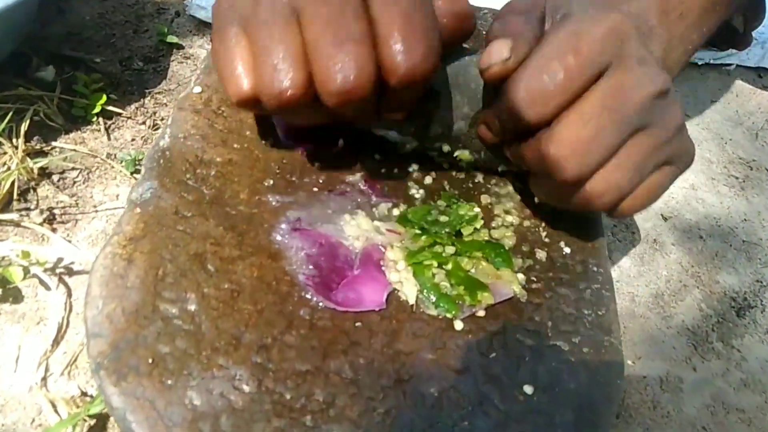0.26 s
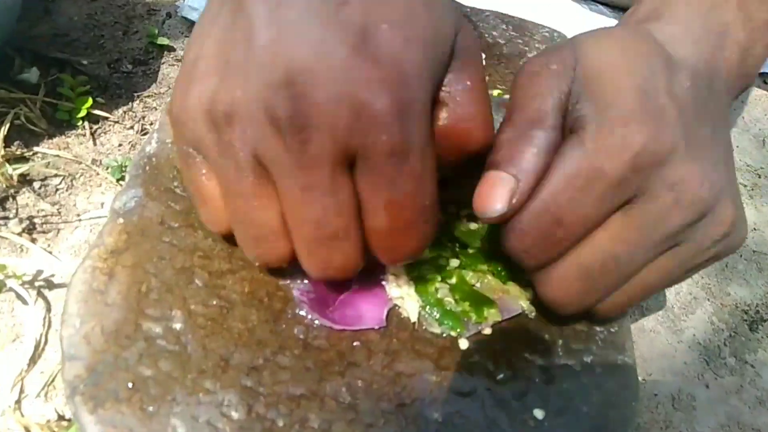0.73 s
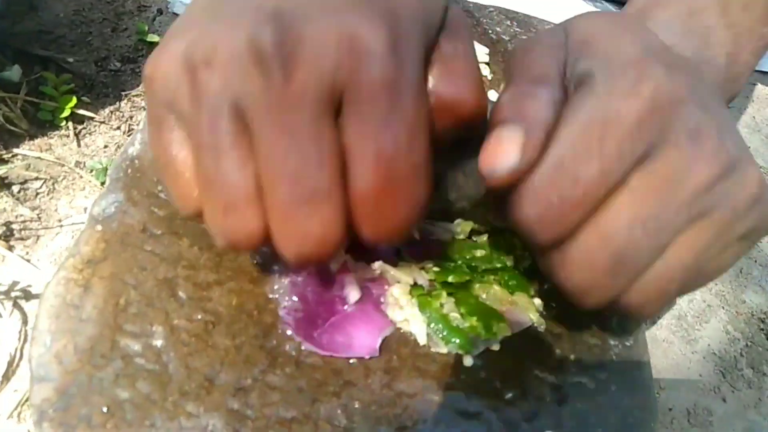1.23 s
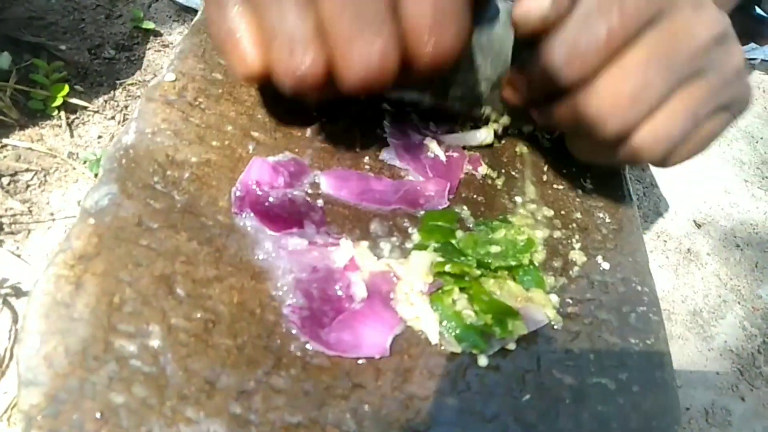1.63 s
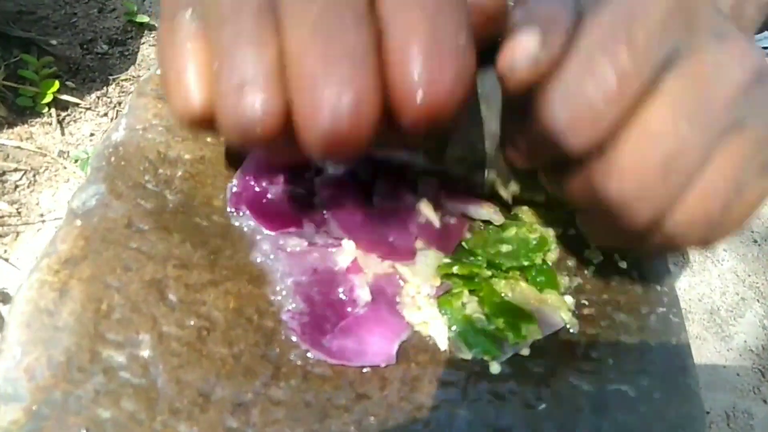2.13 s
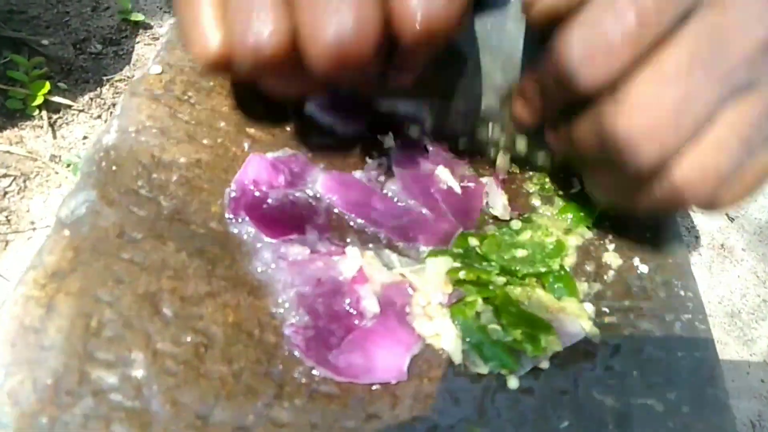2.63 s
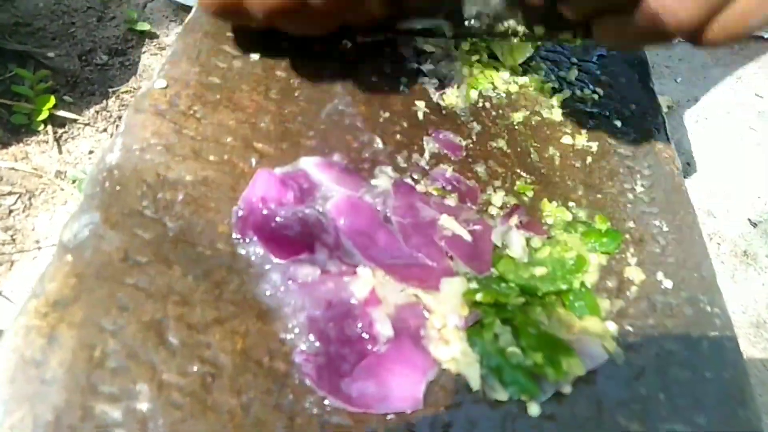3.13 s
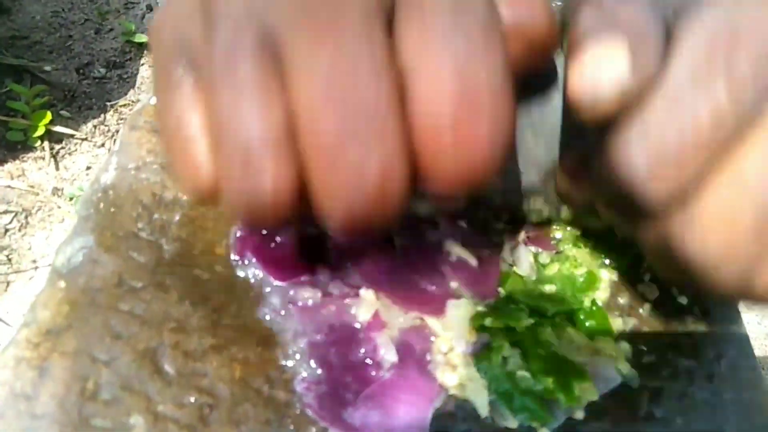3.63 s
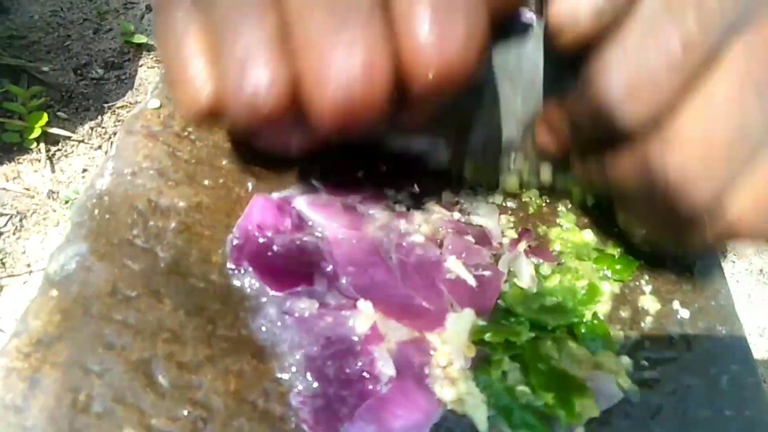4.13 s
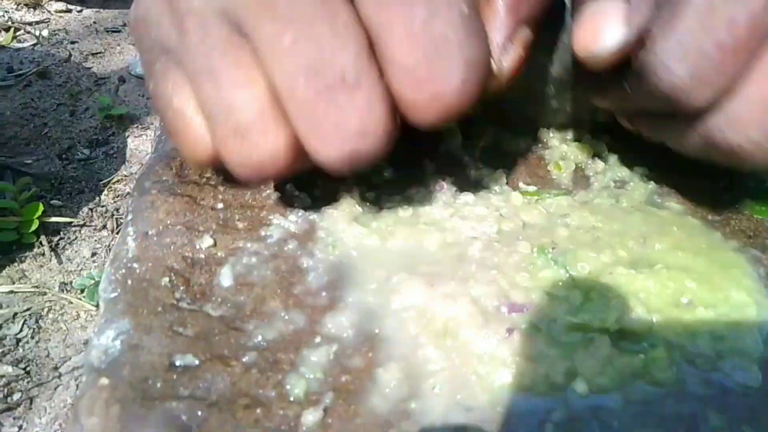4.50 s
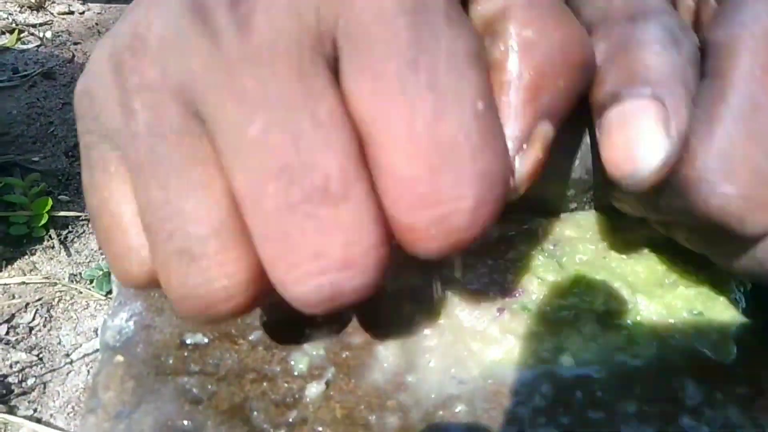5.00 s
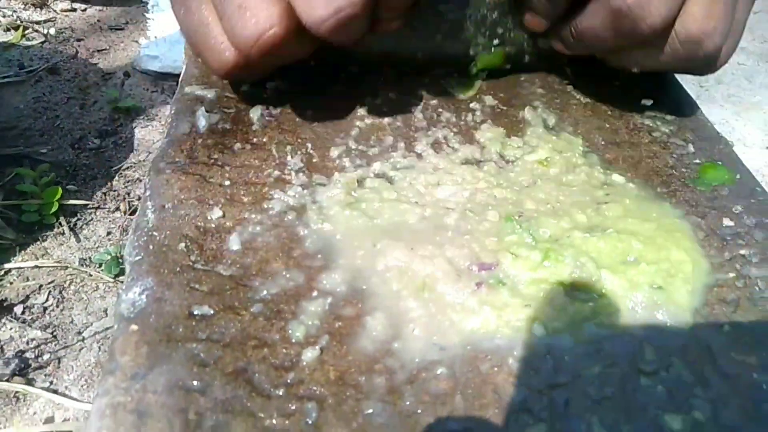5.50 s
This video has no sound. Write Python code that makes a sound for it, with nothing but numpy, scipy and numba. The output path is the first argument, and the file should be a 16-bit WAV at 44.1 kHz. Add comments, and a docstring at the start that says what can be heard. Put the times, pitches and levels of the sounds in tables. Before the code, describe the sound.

Close outdoor sound of a hand stone rubbed back and forth on a stone slab, roughly seven short strokes a second, over very faint air rumble and hiss. From 0 to 1.1 s the rubs are light, gritty and wet. Around 1.2 to 2.1 s the pushes grow firm, with a hollow mid-pitched scraping tone and loud stone clacks near 1.3, 1.85 and 2 s. A softer, squishier stroke follows at 2.25 s, then firm rubs and a tight rattle of knocks near 3.15 s. From 3.3 to 4.1 s it is lighter and juicier, with bubbly crackle, small snaps and dull low bumps; a firm push comes at 4.28 s. Near-silence lasts from about 4.39 to 4.45 s. Then longer, even, duller strokes grind smooth paste, alternating stronger pushes and weaker pulls, with a fine bright wet fizz and a few muted knocks until about 5.7 s. Echoes are barely noticeable.

```python
"""A hand stone rubs back and forth on a stone slab outdoors, about seven strokes a second: random grit impacts
drive broad stone colours and a gliding contact tone.
Knocks excite short slab modes; onion, garlic and leaves squish as shaped impact noise and bubble pings, and snap.
After a brief near-silence the spices are a smooth paste and the strokes are longer, duller and more even.
Faint outdoor rumble and hiss are shaped noise; weak echoes come from a short noise tail."""
import sys
import numpy as np
from scipy import signal
from scipy.fft import rfft, irfft, next_fast_len
from scipy.io import wavfile
from scipy.ndimage import uniform_filter1d, map_coordinates
from numba import njit

SR = 44100
rng = np.random.default_rng(int(sys.argv[2]) if len(sys.argv) > 2 else 0)


def bounce(signal):
    """Save signal as a 16-bit WAV file at the path given by the first command-line argument."""
    frames = np.transpose(np.atleast_2d(signal))
    limited = np.clip(frames, -1, 1)
    pcm = np.round(limited * 32767).astype(np.int16)
    wavfile.write(sys.argv[1], SR, pcm)


N = 253575

# Levels in the tables are relative within each layer.
# stone drops on the slab at a turn or jumps a hard grain: t/s, level/dB, contact tone f/Hz
KNOCKS = [(0.045, -15.5, 1440), (0.317, -26, 1050), (0.804, -26, 1670), (0.831, -24, 1020),
          (0.914, -21, 1100), (1.19, -13.5, 1490), (1.276, -6.5, 1610), (1.543, -18.5, 1580),
          (1.839, -6, 1800), (1.876, -14.5, 1640), (1.973, -8.5, 1510), (2.055, -16.5, 1430),
          (2.459, -24, 1790), (2.62, -26.5, 684), (2.65, -24, 1320), (2.733, -21, 1550), (2.794, -16, 1630),
          (2.876, -11.5, 1440), (3.079, -13.5, 1720), (3.151, -14, 1550), (3.165, -13.5, 1660),
          (3.176, -10.5, 1580), (3.181, -7.5, 1570), (3.445, -27.5, 2040), (3.843, -27, 900),
          (4.102, -20, 1410), (4.212, -22.5, 1710), (4.25, -17, 1680), (4.589, -14, 1610),
          (4.812, -18, 760), (4.91, -17.5, 1910), (4.945, -14.5, 1790), (5.105, -16.5, 1010),
          (5.131, -18.5, 630)]
# crisp pieces and bubbles burst: t/s, level/dB, f/Hz
SNAPS = [(0.1155, -25, 6400), (0.387, -25, 3370), (0.4317, -24.5, 6850), (0.7187, -23.5, 6100),
         (1.0038, -30, 6200), (1.2804, -17.5, 6600), (1.5244, -24.5, 7550), (1.8238, -20, 6100),
         (2.1773, -26, 7000), (2.194, -25, 6660), (2.2612, -23.5, 6950), (3.015, -24, 6570),
         (3.3623, -20.5, 3440), (3.68, -30, 7560), (4.7576, -31, 13600), (5.0432, -24.5, 8500),
         (5.1114, -17.5, 8600), (5.4193, -28, 14200)]
# soft low bumps of the slab on the ground: t/s, level/dB
BUMPS = [(0.471, -48), (0.73, -52), (3.348, -51), (3.495, -41), (3.544, -46.5), (3.645, -51), (4.66, -45),
         (4.945, -45)]
# slab modes: f/Hz, level/dB, t60/s
SLAB_MODES = [(725, -11, 0.054), (840, -23, 0.11), (1150, -3, 0.031), (1410, -36, .04), (1613, -6.5, 0.03),
              (1780, -15, 0.038), (1990, -9, 0.039), (2357, 3, 0.052)]
# spectral colour of bare stone: f/Hz, level/dB
BARE_STONE = [(150, -25.5), (260, -26), (400, -15.5), (650, -4.5), (920, -5), (1250, -0.5), (1600, -0.5),
              (1900, -7.5), (2120, -23.5), (2330, -4.5), (2750, -31.5), (3700, -36.5), (4700, -37),
              (16000, -38)]
# stone coated with paste: f/Hz, level/dB
COATED_STONE = [(150, -23.5), (330, -16.5), (480, -9.5), (650, 3), (1080, -3), (1500, 3), (1880, 2),
                (2100, -10), (2350, -8), (2650, -23), (3500, -33), (4500, -63), (16000, -59)]
# loose juice: f/Hz, level/dB
JUICE = [(2350, -23), (4000, -11.5), (4820, -25), (6470, -3), (6860, 1), (7700, -3.5), (8450, -10.5),
         (10500, -13.5), (12300, -11.5), (14800, -9), (16000, -6.5)]
# tearing fibres: f/Hz, level/dB
FIBRES = [(150, 6), (330, -6), (650, 3), (900, -1), (1450, 8), (2000, 7.5), (2650, -1), (3800, -4),
          (5000, -30), (8000, -25)]
# smooth paste: f/Hz, level/dB
PASTE = [(3000, -19.5), (4500, -15), (5500, -1), (6500, -15), (7500, -2.5), (8500, 0.5), (9900, -21),
         (11000, -2.5), (12000, -8), (14200, -3), (15600, -3)]
# soil under the slab: f/Hz, level/dB
GROUND = [(50, -23), (170, 10.5), (330, -0.5), (800, 0.5), (1500, -22), (4000, -60)]
# outdoor air: f/Hz, level/dB
AIR = [(20, 26.5), (45, 13.5), (110, 8.5), (260, 6), (900, -1), (1800, 1.5), (2600, -4.5), (4700, -14.5),
       (6800, -6), (9000, -10), (15500, -9)]
# thin overtones of the hand stone: f/Hz, half bandwidth of each of two passes/Hz, level/dB
STONE_MODES = [(5160, 510, -11.5), (8360, 430, 2.5), (10640, 360, -5)]
# near-silence: start t/s, end t/s
PAUSE_S = (4.386, 4.452)
# top treble of the wet sounds, rising as the microphone comes nearer: t/s, level/dB; bubble pitch rises with it
TOP_TREBLE = [(0, -11), (2.2, -10), (3.2, -1.5), (4.2, 2.5), (5.7, 4.5)]
# stone pushed into the spices: crest t/s, length/s, stone level/dB, juice level/dB
PUSHES = [(0.17, 0.097, -35.5, -50), (0.448, 0.11, -38, -53.5), (0.822, 0.068, -38, -46.5),
          (1.081, 0.079, -41, -48), (1.337, .09, -25.5, -47), (1.599, 0.12, -26, -48.5),
          (1.868, 0.093, -23.5, -48), (2.255, 0.17, -56.5, -40.5), (2.525, .10, -31, -45.5),
          (2.788, 0.11, -27, -48), (3.06, .11, -26, -46), (3.445, .06, -40, -43), (3.759, .11, -46, -44),
          (4.013, 0.096, -43.5, -43), (4.278, 0.091, -23, -43.5)]
# stone pulled back over nearly bare slab: crest t/s, length/s, stone level/dB, juice level/dB, contact tone f/Hz
PULLS = [(0.052, .022, -37.5, -53.5, 2230), (0.314, 0.037, -39.5, -54, 1600),
         (0.921, 0.019, -44, -56, 2180), (1.201, .034, -35.5, -56.5, 2140), (1.465, .035, -39, -53.5, 1300),
         (1.714, 0.029, -45.5, -55.5, 1090), (1.985, 0.2, -32.5, -58.5, 1440),
         (2.361, .12, -58, -53.5, 1390), (2.645, 0.067, -37.5, -52, 1290), (2.908, 0.074, -37, -57.5, 1440),
         (3.18, .175, -31.5, -63, 1514), (3.554, .1, -53.5, -52.5, 527), (3.846, 0.038, -41.5, -54.5, 776),
         (4.122, .10, -31.5, -50, 1330), (4.361, 0.042, -40, -71, 1610)]
# strokes through paste, pull and push in turn: crest t/s, length/s, stone level/dB
PASTE_STROKES = [(4.495, 0.092, -52.5), (4.646, .115, -29), (4.795, 0.12, -35.5), (4.935, 0.13, -28),
                 (5.087, 0.14, -32.5), (5.243, 0.15, -28), (5.399, .145, -33), (5.55, 0.14, -28),
                 (5.695, 0.14, -32)]
# in paste, a pull and a push: contact tone f/Hz, glide as share of pitch, tone share 0-1,
# juice re stone level/dB, tearing re juice level/dB before TEAR_TRIM_DB
PASTE_WAYS = [(880, -.5, .36, -17.5, 3), (1102, 0.32, 0.19, -26, -4)]
# a larger wet piece gives way between strokes: crest t/s, rise/s, fall/s, level/dB
SQUELCHES = [(1.775, 0.077, 0.045, -53), (2.99, 0.065, .022, -50.5), (3.319, 0.025, 0.017, -44.5),
             (3.5, .05, 0.054, -46.5), (3.897, 0.051, 0.057, -48)]
# bare stones ring on as they bounce apart: f/Hz, level re KNOCKS/dB, t60/s
FREE_RING = (2335, -28, .13)
# juice round a stroke: delay after stone crest/s, rise/s, fall/s, tearing level/dB before TEAR_TRIM_DB
PUSH_JUICE, PULL_JUICE = (-.009, 0.0982, 0.0686, -53), (.014, .075, .11, -61.5)

TOP_HZ = 15650  # band limit
PUSH_RISE, PULL_RISE, PASTE_RISE = .47, .3, .5  # share of a stroke before its crest
PUSH_SWELL, PULL_SWELL, PASTE_SWELL = 1.67, 1.36, 1.33  # pointedness: 1 = a plain arch
FIRM_DB, FIRM_HZ, FIRM_SHARE = -26, 1640, 0.92  # firm push: level, contact tone, share of that tone
LIGHT_HZ_PER_DB, LIGHT_SHARE_PER_DB = 10, .012  # a lighter push sings higher and less clearly
SING_DB = -41.5  # below about this level a push slides on the juice and hardly sings
PUSH_GLIDE, PULL_GLIDE = -0.12, 0.088  # tone change through a stroke, share of its pitch
PULL_SHARE = .27  # share of the contact tone in a pull
SQUELCH_TEAR_DB = -13.5  # tearing re juice, before TEAR_TRIM_DB
TEAR_TRIM_DB = 4.0  # added to every tearing level
PAUSE_DB = -28  # gain during the pause


def amp(db):
    """Decibels to gain."""
    return 10 ** (np.asarray(db) / 20)


def unit(x):
    """Scale to rms 1."""
    return x / np.sqrt(np.mean(x ** 2) + 1e-20)


def add(track, t_s, sound):
    """Mix a sound into a track from t_s on."""
    i = round(t_s * SR)
    start = max(i, 0)
    part = sound[max(-i, 0):max(N - i, 0)]
    track[start:start + len(part)] += part


def along(points, hz):
    """Gain of (Hz, dB) points on a log frequency axis."""
    f_hz, db = np.transpose(points)
    return amp(np.interp(np.log(hz + 1), np.log(f_hz), db))


def response(points, size=2048):
    """Causal (minimum-phase) impulse response of energy 1 with the given colour."""
    cepstrum = irfft(np.log(along(points, np.fft.rfftfreq(size, 1 / SR))))
    cepstrum[1:size // 2] *= 2
    cepstrum[size // 2 + 1:] = 0
    h = irfft(np.exp(rfft(cepstrum)))
    return h / np.linalg.norm(h)


def through(x, h):
    """x played through an impulse response."""
    return signal.fftconvolve(x, h)[:len(x)]


@njit
def resonate(x, hz, q):
    """Band-pass resonance with a moving centre and gain q there."""
    y, low, band = np.zeros(len(x)), 0., 0.
    for i in range(len(x)):
        g = np.tan(np.pi * hz[i] / SR)
        y[i] = (band + g * (x[i] - low)) / (1 + g * (g + 1 / q))
        band = 2 * y[i] - band
        low += 2 * g * y[i]
    return y


def ring(x, hz, q):
    """Fixed resonance with gain 1 at its centre."""
    return resonate(x, np.full(len(x), float(hz)), float(q)) / q


def swing(rise_s, fall_s, power):
    """Level through one stroke: the hand speeds up and slows to the turn."""
    t = np.arange(round((rise_s + fall_s + .02) * SR)) / SR
    progress = np.interp(t, [0, rise_s, rise_s + fall_s], [0, .5, 1])
    return np.abs(np.sin(np.pi * progress)) ** power


def grains(n, rate_hz, spread_db):
    """Random tiny impacts of widely different sizes and either sign."""
    sizes = amp(spread_db * np.clip(rng.standard_normal(n), -2, 2))
    return (rng.random(n) < rate_hz / SR) * sizes * rng.choice([-1, 1], n)


def judder(n, rate_hz, depth_db):
    """Uneven pressure as the stone catches and slips: smooth random gain within +-depth_db."""
    knots = rng.standard_normal(int(n * rate_hz / SR) + 4)
    wander = map_coordinates(knots, [np.arange(n) * rate_hz / SR])
    return amp(depth_db * np.tanh(wander))


def played(x, level):
    """Lay x under a level curve, keeping the energy of that curve."""
    return unit(x * level) * np.sqrt(np.mean(level ** 2))


def open_air():
    """Faint steady outdoor rumble and hiss: noise in the colour of the air."""
    spectrum = rfft(rng.standard_normal(N)) * along(AIR, np.fft.rfftfreq(N, 1 / SR))
    return amp(-58) * unit(irfft(spectrum, N))


def squeezes():
    """Every stroke presses out juice: crest t/s, rise/s, fall/s, level/dB, tearing re juice/dB."""
    for table, (delay_s, rise_s, fall_s, tear_db) in ((PUSHES, PUSH_JUICE), (PULLS, PULL_JUICE)):
        for crest_s, _, _, juice_db, *_ in table:
            yield crest_s + delay_s, rise_s, fall_s, juice_db, tear_db - juice_db
    for k, (crest_s, length_s, stone_db) in enumerate(PASTE_STROKES):
        *_, juice_db, tear_db = PASTE_WAYS[k % 2]
        yield crest_s, length_s / 2, length_s / 2, stone_db + juice_db, tear_db
    for row in SQUELCHES:
        yield *row, SQUELCH_TEAR_DB


def bubbles(n, rate_hz, centre_hz, cycles):
    """Tiny bubbles, each ringing at its own pitch and losing 60 dB in the given cycles."""
    count = max(int(rate_hz * n / SR), 1)
    pitch, size = rng.standard_normal((count, 2)).T[:, :, None]
    age = np.arange(SR // 150)  # samples
    phase = np.minimum(centre_hz * np.exp(.22 * pitch), TOP_HZ) * age / SR
    strength = amp(4.5 * np.clip(size, -2, 2))
    pings = strength * np.sin(2 * np.pi * phase) * amp(-60 * phase / cycles)
    at = rng.integers(0, n, (count, 1)) + age
    return np.bincount(at.ravel(), pings.ravel(), n)[:n]


def squishing():
    """Countless cells and bubbles burst under each stroke while fibres tear lower down."""
    out = np.zeros(N)
    juice, paste, fibres = response(JUICE), response(PASTE), response(FIBRES)
    for crest_s, rise_s, fall_s, db, tear_db in squeezes():
        level = swing(rise_s, fall_s, power=1.27)
        n = len(level)
        pressure = judder(n, rate_hz=71.0, depth_db=6.0)
        fizz = grains(n, rate_hz=9000, spread_db=8.0) * pressure
        if crest_s < PAUSE_S[0]:  # loose juice holds bubbles; their pitch rises with the top treble
            bubble_hz = 7500 + 110 * np.interp(crest_s, *np.transpose(TOP_TREBLE))
            pings = bubbles(n, rate_hz=1100, centre_hz=bubble_hz, cycles=32)
            fizz = unit(through(fizz, juice)) + amp(-9.5) * unit(pings * pressure)
        else:
            fizz = through(fizz, paste)
        tear_grit = grains(n, rate_hz=4500, spread_db=4.5) * pressure
        tear = through(tear_grit * judder(n, rate_hz=151.4, depth_db=5.5), fibres)
        wet = played(fizz, level) + amp(tear_db + TEAR_TRIM_DB) * played(tear, level)
        add(out, crest_s - rise_s, amp(db) * wet)
    return out


def yard(x):
    """Weak scattered echoes from the ground and nearby things: a decaying noise tail."""
    t = np.arange(SR // 3) / SR
    tail = rng.standard_normal(len(t)) * amp(-60 * t / 0.12) * (1 - np.exp(-t / 0.0014))
    return through(x, tail / np.linalg.norm(tail))


def stroke(crest_s, length_s, rise_share, db, hz, glide, share, swell):
    """One stroke whose contact tone glides through hz."""
    rise_s = length_s * rise_share
    from_hz, to_hz = hz * (1 - glide / 2), hz * (1 + glide / 2)
    return crest_s, rise_s, length_s - rise_s, db, from_hz, to_hz, share, swell


def strokes():
    """Firmer pushes sing more; pulls rasp; in paste the tone falls on a pull and climbs on a push."""
    for crest_s, length_s, db, _ in PUSHES:
        lighter_db = FIRM_DB - db
        hz = FIRM_HZ + LIGHT_HZ_PER_DB * lighter_db
        share = (FIRM_SHARE - LIGHT_SHARE_PER_DB * lighter_db) / (1 + np.exp(SING_DB - db))
        yield stroke(crest_s, length_s, PUSH_RISE, db, hz, PUSH_GLIDE, share, PUSH_SWELL)
    for crest_s, length_s, db, _, hz in PULLS:
        yield stroke(crest_s, length_s, PULL_RISE, db, hz, PULL_GLIDE, PULL_SHARE, PULL_SWELL)
    for k, (crest_s, length_s, db) in enumerate(PASTE_STROKES):
        hz, glide, share, _, _ = PASTE_WAYS[k % 2]
        yield stroke(crest_s, length_s, PASTE_RISE, db, hz, glide, share, PASTE_SWELL)


def stone_overtones(grit):
    """Thin high modes of the hand stone, each a doubled resonance."""
    out = np.zeros(len(grit))
    for hz, half_width_hz, db in STONE_MODES:
        q = hz / half_width_hz / 2
        out += amp(db) * ring(ring(grit, hz, q), hz, q)
    return out


def grinding():
    """Grit drives the slab broadly and the hand stone's contact tone, which glides as the stone rocks."""
    out = np.zeros(N)
    bare, coated = response(BARE_STONE), response(COATED_STONE)
    for crest_s, rise_s, fall_s, db, from_hz, to_hz, share, swell in strokes():
        level = swing(rise_s, fall_s, swell)
        n = len(level)
        if crest_s < PAUSE_S[0]:
            body = bare
            grit = grains(n, rate_hz=2000, spread_db=4.5) * judder(n, rate_hz=201.2, depth_db=5.5)
        else:  # paste cushions the contact: a duller, broader rub that catches in lumps
            body = coated
            grit = grains(n, rate_hz=1500, spread_db=3.5) * judder(n, rate_hz=201.0, depth_db=2)
            grit = grit * judder(n, rate_hz=67.4, depth_db=3.5)
        contact_hz = np.interp(np.arange(n) / SR, [0, rise_s + fall_s], [from_hz, to_hz])
        tone = resonate(resonate(grit, contact_hz, 4.8), contact_hz, 4.8)
        broad = through(grit, body)
        rub = np.sqrt(share) * unit(tone) + np.sqrt(1 - share) * unit(broad)
        overtone_gain = amp(-27.5 - 7.6 * share)
        sound = played(rub, level) + overtone_gain * played(stone_overtones(grit), level)
        add(out, crest_s - rise_s, amp(db) * sound)
    return out


def knocks():
    """A hard contact builds up over a millisecond and lasts about three cycles of the contact tone."""
    out = np.zeros(N)
    body = response(COATED_STONE)
    for t_s, db, hz in KNOCKS:
        blow = ring(ring(body, hz, .8), hz, 1.1)
        add(out, t_s + 0.001092, amp(db - 1.5) * blow / np.abs(blow).max())
    return out


def slab_ring(x):
    """The slab's modes ring on briefly after every contact; strongest response scaled to gain 1."""
    t = np.arange(SR // 5) / SR
    h = sum(amp(db - 60 * t / t60_s) * np.sin(2 * np.pi * hz * t) for hz, db, t60_s in SLAB_MODES)
    return through(x, h / np.abs(rfft(h)).max())


def free_ring():
    """Until the paste damps them, the stones keep one clear note after each knock."""
    out = np.zeros(N)
    t = np.arange(SR // 4) / SR
    hz, ring_db, t60_s = FREE_RING
    note = np.sin(2 * np.pi * hz * t) * amp(ring_db - 60 * t / t60_s) * (1 - np.exp(-t / .001))
    for t_s, db, _ in KNOCKS:
        if t_s < PAUSE_S[0]:
            add(out, t_s + .002, amp(db) * note)
    return out


def snaps():
    """Each is a sharp noise crack over a weaker burst that rises and falls evenly, coloured by its own pitch."""
    out = np.zeros(N)
    t = np.arange(SR // 20) / SR
    wet = response([(800, -11), (2200, -7), (3500, 0.5), (4800, -12.0),
                    (7000, 1.5), (11000, -7.5), (15000, 3.5)])  # f/Hz, level/dB
    centre_s = .025
    from_centre_s = np.abs(t - centre_s)
    burst = np.exp(-from_centre_s / 0.00062) + amp(-9.5) * np.exp(-from_centre_s / 0.005)
    for t_s, db, hz in SNAPS:
        crack = through(rng.standard_normal(len(t)) * burst, wet)
        crack = crack + 2 * ring(crack, hz, 3.5)
        add(out, t_s - centre_s + 0.0007, amp(db) * crack / np.abs(crack).max())
    return out


def bumps():
    """The slab shifts on the soil: one dull push and a little loose rattle."""
    out = np.zeros(N)
    t = np.arange(SR // 10) / SR
    soil = response(GROUND)
    for t_s, db in BUMPS:
        rattle = rng.standard_normal(len(t)) * amp(-60 * t / 0.18)
        push = (t == 0) + amp(-34.5) * rattle
        thud = through(push, soil)
        add(out, t_s, amp(db + 9.5) * thud / np.abs(thud).max())
    return out


def scene():
    """Stones, spices and air; everything drops to near-silence for a moment."""
    t = np.arange(N) / SR
    spices = squishing() + snaps()
    treble_gain = amp(np.interp(t, *np.transpose(TOP_TREBLE)))
    spices = spices + (treble_gain - 1) * ring(spices, 17100, 0.97)
    stones = grinding() + knocks()
    ringing_db = np.where(t < PAUSE_S[0], 2.5, -2.5)  # the paste damps the slab
    work = stones + amp(ringing_db) * slab_ring(stones) + free_ring() + spices + bumps()
    outdoors = work + amp(-25.0) * yard(work) + open_air()
    in_pause = (t > PAUSE_S[0]) & (t < PAUSE_S[1])
    silent = uniform_filter1d(in_pause * 1., size=200)
    return (outdoors * amp(PAUSE_DB * silent))[None]


def record(dry):
    """Nothing is kept above the band limit."""
    size = next_fast_len(N + 4096)
    kept = np.fft.rfftfreq(size, 1 / SR) < TOP_HZ
    return irfft(rfft(dry, size) * kept, size)[:, :N]


dry = scene()
out = record(dry)
bounce(out)
```